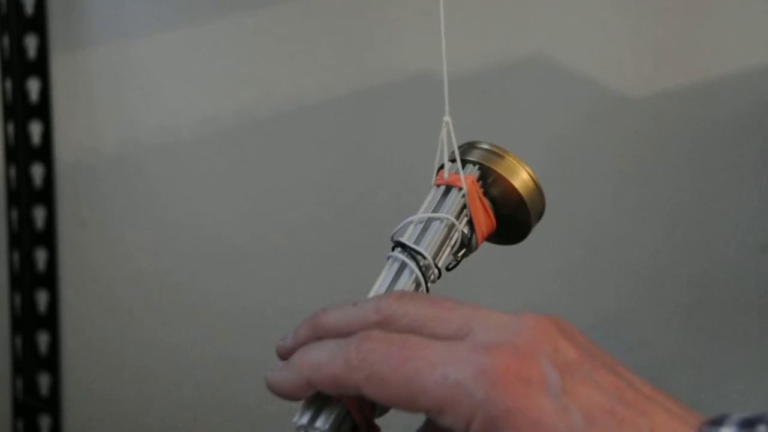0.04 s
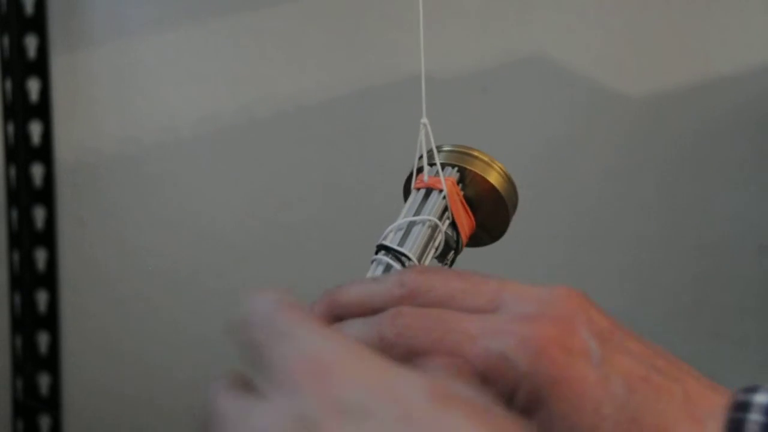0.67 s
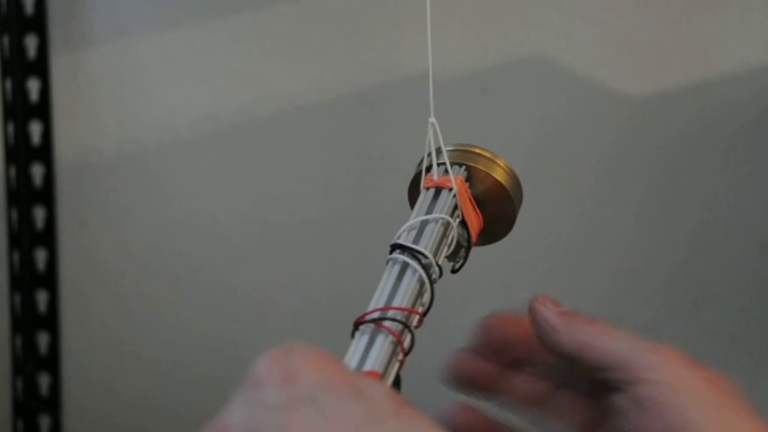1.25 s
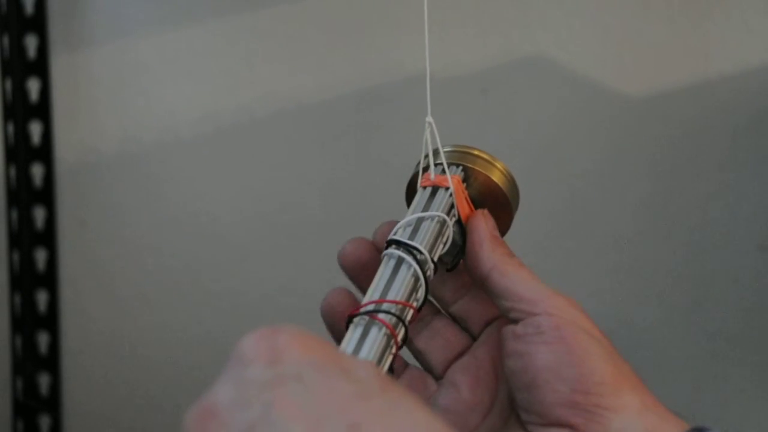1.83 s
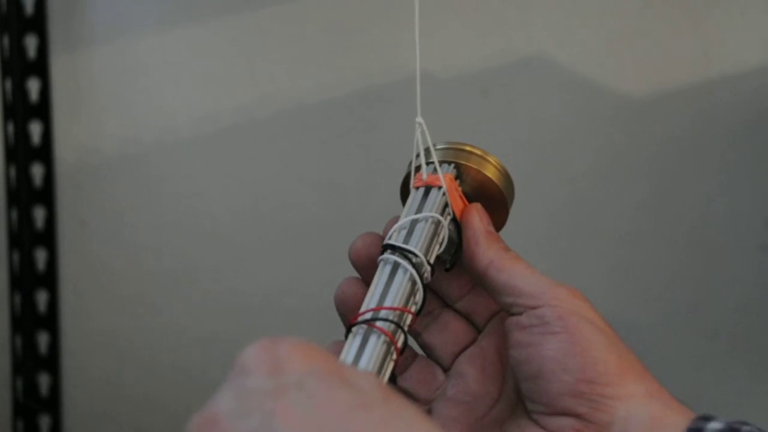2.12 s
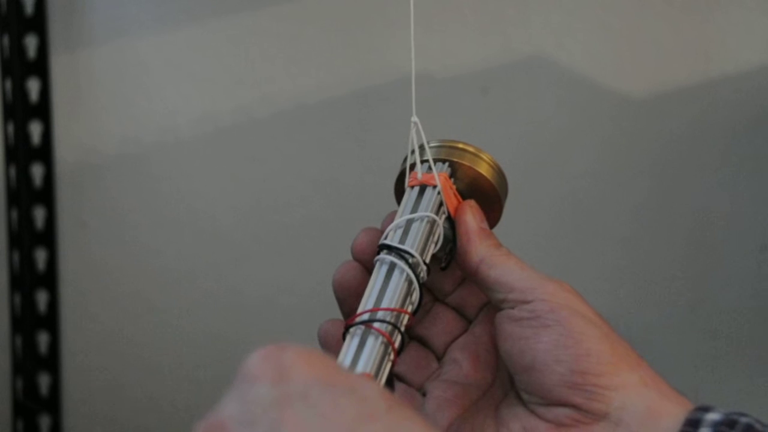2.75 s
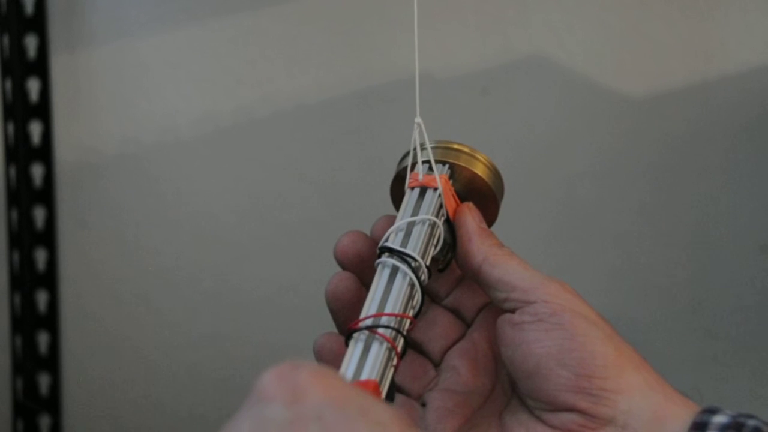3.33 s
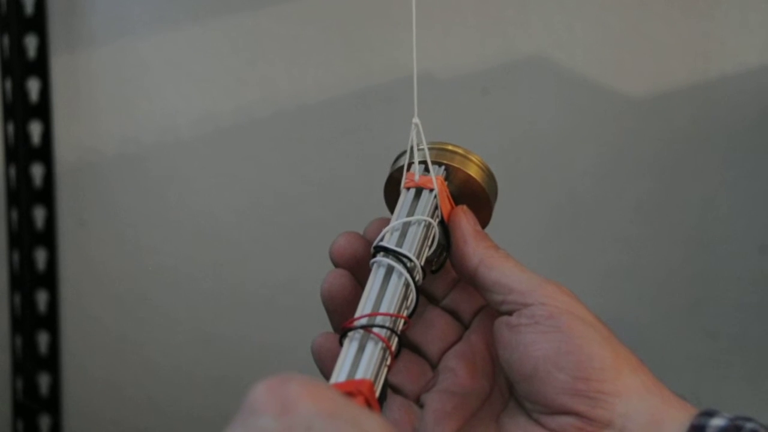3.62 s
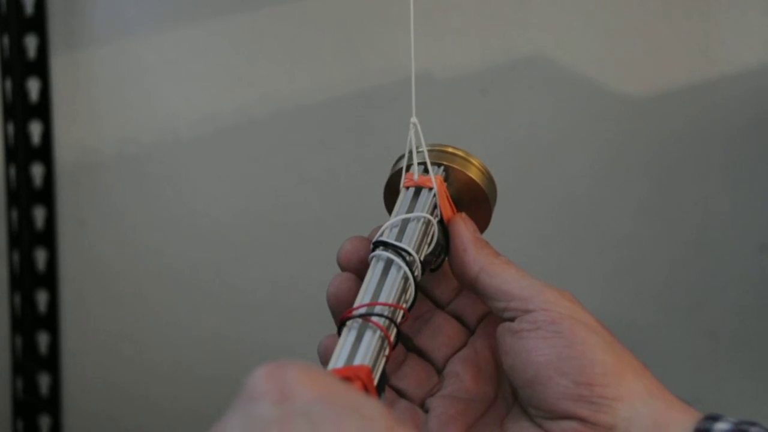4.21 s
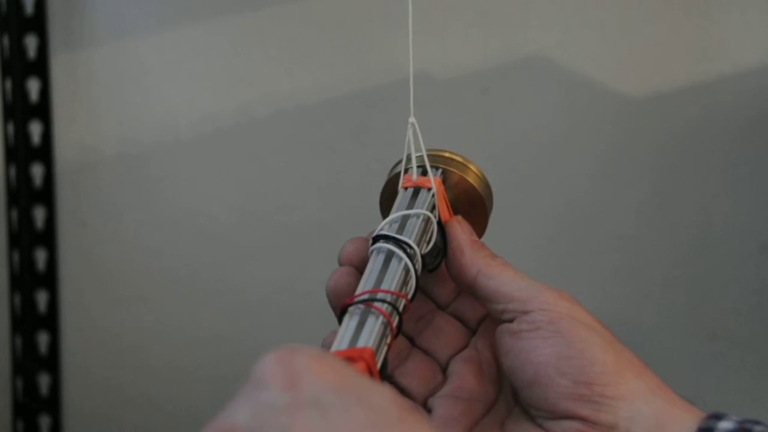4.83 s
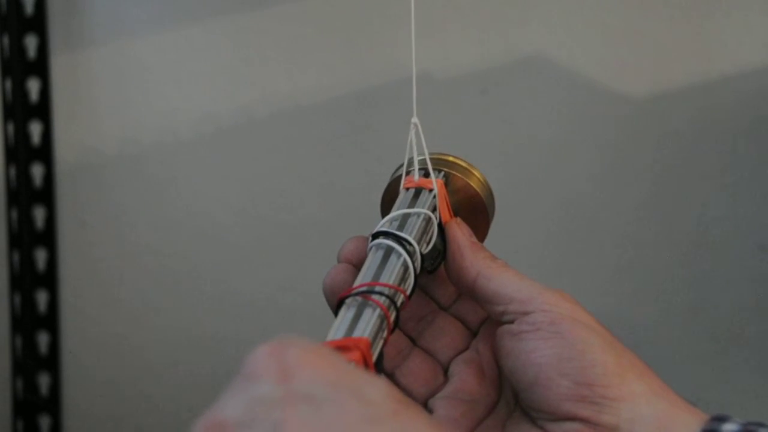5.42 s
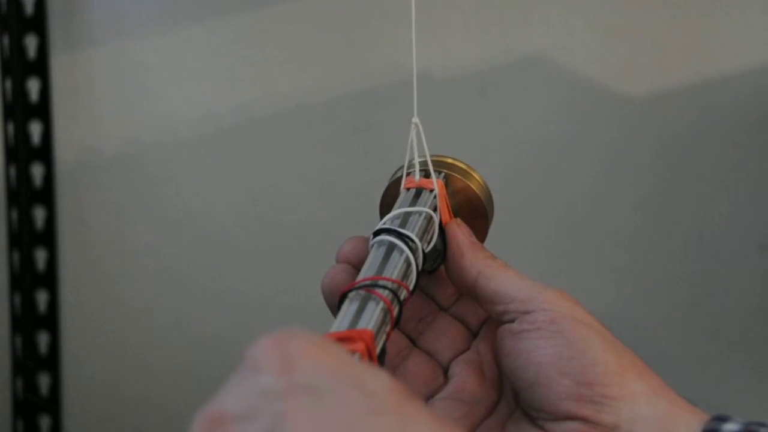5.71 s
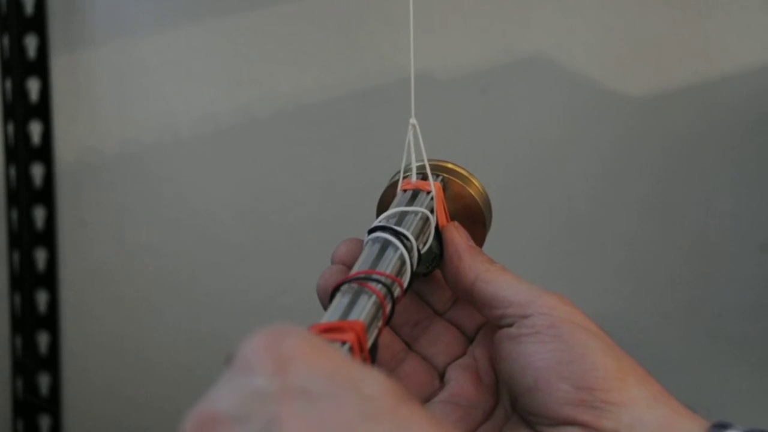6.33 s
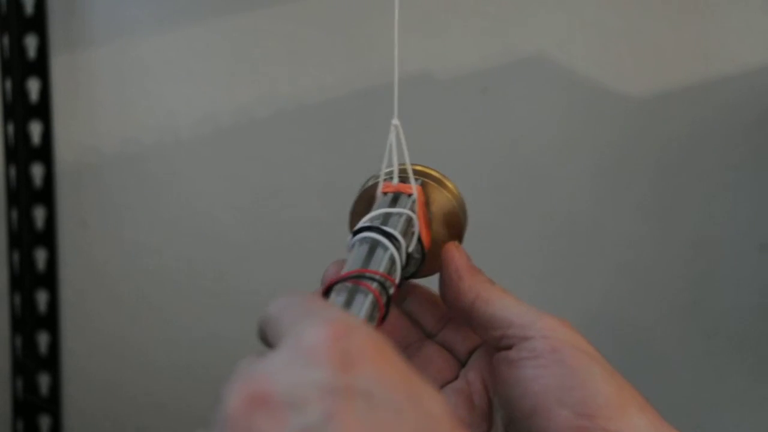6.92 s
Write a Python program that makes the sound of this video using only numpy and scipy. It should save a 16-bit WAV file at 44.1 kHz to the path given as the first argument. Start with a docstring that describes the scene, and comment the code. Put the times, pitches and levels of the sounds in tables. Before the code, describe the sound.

A small electric motor spins a brass wheel on a metal tube, running steadily with a hum, a fine metallic rasp and a thin, wavering high whine. In the first second a hand slides along the tube in a few short strokes. The motor then slows very slightly, and one faint rub comes near the end. It sounds close, in a quiet room with soft hiss.

```python
"""A small electric motor hums, whines and rasps in a quiet room.
It spins a brass wheel on a metal tube that hangs from a string. The spinning part (the rotor) is off
balance, so it hums; its brushes (sliding contacts) scrape and whine, biting harder once a turn.
It slows a little as fingers steady the tube. A hand slides on the tube at first and faintly at the end.
Mains hum and a soft hiss lie underneath."""
import sys
import numpy as np
from scipy import signal
from scipy.fft import rfft, irfft, next_fast_len
from scipy.io import wavfile

SR = 44100
rng = np.random.default_rng(int(sys.argv[2]) if len(sys.argv) > 2 else 0)


def dump_mix(stems):
    """Bounce the given channels to the path in sys.argv[1] as a 16-bit WAV at rate SR."""
    frames = np.atleast_2d(stems).T  # one column per channel
    limited = np.clip(frames, -1, 1)  # hard clip at full scale
    pcm = np.round(limited * 32767).astype(np.int16)
    wavfile.write(sys.argv[1], SR, pcm)


N = 306936
T = np.arange(N) / SR
SIDES = np.array([[.5], [-.5]])  # shares a left-right difference between the two sides

# how fast the rotor spins: time_s, turns_per_s
ROTOR_SPEED = [(0, 262.08), (1.2, 262.08), (2.5, 261.9), (3.8, 261.68), (5, 261.02), (6.2, 260.43),
               (6.96, 260.35)]
# the motor's tones, by order (order 2 vibrates twice a turn); the share is held within 0-1
# order: level_db, flutter_share, left_louder_db, left_lead_rad
MOTOR_TONES = {1: (-55.5, 0, 3, 0.5), 2: (-59, 0, 4.5, 0.62), 3: (-73, 0.1, -6, 1.1), 4: (-71, 0.4, 6, 1),
               5: (-69, 1.4, 9, 0), 6: (-68, 0.67, 0, -0.8), 7: (-69, 0.5, -6, 0), 8: (-69, 0.4, 7, 2),
               9: (-58.5, 0.2, 6.5, 0.86), 10: (-63.5, 0.55, 3.5, 0.64), 11: (-63, 1.8, 0.5, 0),
               12: (-69.5, 0.5, -10, 1.2), 13: (-68.5, -1.3, 2, 1.3), 14: (-65, 0.5, 0, 1.1),
               15: (-61, 1.3, 0, 1.1), 18: (-58, .2, -10.5, 2), 20: (-64, 0.5, 5, 0.7),
               21: (-63.5, -0.5, 7, 2), 22: (-68.5, -1, -6, 2), 23: (-69.5, 1, 1, 1.3),
               24: (-62.5, 0.6, -2.5, 1.94), 30: (-70, 1.5, 0.5, 2.5), 36: (-71, 1, -7, 4.5),
               40: (-65.5, 0.05, -2, 1.5), 41: (-59, 0.08, 5.5, 1.54), 42: (-52, 0.17, 8.5, 2.5),
               43: (-78, 1, 1, 3), 45: (-66, 1, 5, 3.5), 47: (-65, 0, 5, 4), 48: (-69, .3, 4, 4.5)}
# the next five tables only shape how tones swell and fade; MOTOR_TONES sets their average level
# off-balance hum, shifting with the grip: time_s, order_1_db, order_2_db, order_3_db
HUM_SWELL = [(0.0, -55.5, -61, -63.5), (0.76, -55.5, -61, -71.5), (2.14, -55.0, -58.0, -73.5),
             (4.84, -55.5, -58.5, -75), (6.35, -57.0, -57, -72), (6.63, -57.5, -57.5, -79),
             (6.95, -58, -56, -68)]
# the tube sings along with order 9, most when held firmly: time_s, level_db
TUBE_SWELL = [(0.0, -60.5), (0.7, -69), (0.79, -63), (0.94, -65.0), (1.89, -55.5), (2.24, -59.5),
              (2.61, -55.5), (2.86, -58.0), (3.5, -55.0), (3.69, -58.5), (3.89, -54.5), (4.74, -58),
              (6.1, -58.5), (6.32, -67.5), (6.51, -62.5), (6.95, -66)]
# loose chatter just above the tube's note: time_s, order_10_db, order_11_db
CHATTER_SWELL = [(0, -68, -64.0), (0.3, -65.5, -65), (1.2, -63.5, -69.0), (2.5, -66, -70.5),
                 (3.9, -64.5, -62.5), (4.75, -61.5, -61), (5.1, -64.5, -66.5), (6.3, -69, -62),
                 (6.96, -64.5, -60.5)]
# the lower whine of the brushes on their contacts, order 41: time_s, level_db
LOW_WHINE_SWELL = [(0.0, -65), (0.58, -59.5), (1.39, -57), (1.72, -51.5), (2.63, -61), (2.72, -54.5),
                   (2.88, -61), (3.28, -52), (3.68, -63), (4.02, -61), (4.14, -66), (4.57, -61),
                   (4.69, -62.5), (5.46, -55), (5.74, -60), (6.66, -58), (6.85, -62.5), (6.95, -62)]
# the upper whine, order 42: time_s, level_db
HIGH_WHINE_SWELL = [(0.0, -64.0), (0.28, -54), (0.92, -59), (1.44, -47), (1.55, -57), (1.71, -48.0),
                    (2.08, -59), (2.2, -48), (2.54, -52.5), (2.62, -71), (2.78, -49.0), (2.9, -62),
                    (3.31, -52.5), (3.71, -56.5), (3.84, -53), (4.36, -49), (4.5, -54.5), (4.76, -42),
                    (5.12, -48.5), (5.73, -41.5), (5.86, -56.5), (6.1, -49), (6.9, -47.5), (6.95, -56)]
# the bearing rattles briefly and the chatter flares: time_s, rise_db
BEARING_RATTLES = [(2.75, 6), (2.87, 6), (3.45, 9), (3.88, 5), (4.13, 4), (4.34, 5), (4.69, 5), (4.89, 6),
                   (5.41, 7), (6.75, 3.5), (6.86, 4)]
# tones of the housing, which buzzes more as fingers slow the motor: order
HOUSING_ORDERS = (5, 6, 7)
# how the motor's metal can rings when the brushes scrape: pitch_hz, relative_db
CAN_SPECTRUM = [(2000, -29.5), (2200, -16), (3150, -18), (3500, -11.5), (3800, -9.5), (4030, -3),
                (4190, -5.5), (4620, -4), (4770, 0.5), (5000, -3), (5480, -7), (5620, -13), (7600, -16.5),
                (10200, -20), (15500, -24.5)]
# the hand's strokes along the tube: start_s, end_s, level_db
HAND_STROKES = [(0.14, 0.22, -48.5), (.26, 0.395, -47), (.43, .48, -55), (0.86, 0.888, -49),
                (0.946, 0.985, -49.5), (6.713, 6.928, -60)]
# the sound of skin sliding on metal: pitch_hz, relative_db
SKIN_SPECTRUM = [(150, -17), (350, -4.5), (600, -15), (1000, -12), (1250, -5), (1550, -15), (2350, -6),
                 (2650, -0.5), (3080, 3.5), (3400, -12), (4100, -12), (5400, -7), (7000, -4.5),
                 (11000, -24)]
# steady room tones (low drone, mains hum, thin high whistle): pitch_hz, level_db
ROOM_TONES = [(24, -60.5), (48, -68.5), (120, -80.5), (240, -76.5), (300, -77), (360, -71), (420, -78),
              (480, -75.5), (540, -76.5), (600, -86), (720, -83), (876, -76.5), (900, -80.5), (15734, -74)]
# room rumble and hiss: pitch_hz, relative_db
AIR_SPECTRUM = [(15, 7.5), (90, 1), (200, -2), (380, -4), (650, -7.5), (1300, -6), (1900, -8.5), (4000, -4),
                (7000, -7), (9000, -5.5), (10400, -3), (12000, -5), (13500, -3.5), (15800, -8.5)]
# how noise reaches the left and right sides: pitch_hz, left_lead_rad, likeness (0-1), left_louder_db
STEREO_SPREAD = [(50, 0.5, 0.53, 0.5), (260, 0.26, 0.46, 0), (650, 0.77, 0.29, 1.5), (1580, 0.62, 0.65, 1),
                 (2400, 0.54, 1, 1.5), (2860, 0.23, 1, -1.5), (3520, 0.9, .65, 4), (4200, 0.56, 0.6, -2.5),
                 (4790, 1.86, 0.9, 4), (5300, 0.62, 0.92, -1.5), (5980, 2.4, 0.53, -3),
                 (6730, 1.7, 0.6, -0.5), (10500, 3.25, 0.49, 2.5), (12200, 3.7, 0.76, 2), (15600, 4, .4, 4)]


def motor_tones(angle, speed, buzz_db_per_lost_turn=1, buzz_hz=8.1, whine_hz=5, other_hz=12.6):
    """Tones at multiples of the spin speed; loose bearings make them flutter at the given rates."""
    buzz_db = buzz_db_per_lost_turn * (speed.max() - speed)
    swell_db = dict.fromkeys(HOUSING_ORDERS, buzz_db)
    swell_db[1], swell_db[2], swell_db[3] = over_time(HUM_SWELL)
    swell_db[9], = over_time(TUBE_SWELL)
    swell_db[10], swell_db[11] = bearing_chatter()
    swell_db[41], = over_time(LOW_WHINE_SWELL)
    swell_db[42], = over_time(HIGH_WHINE_SWELL)
    flutter_hz = {41: whine_hz, 42: whine_hz} | dict.fromkeys(HOUSING_ORDERS, buzz_hz)
    out = np.zeros((2, N))
    for order, (level_db, share, pan_db, lead) in MOTOR_TONES.items():
        share = np.clip(share, 0, 1)
        rate_hz = flutter_hz.get(order, other_hz)
        unsteady = (flutter(rate_hz) + 1j * flutter(rate_hz)) / np.sqrt(2)  # in strength and timing
        wobble = np.sqrt(1 - share) + np.sqrt(share) * unsteady
        strength = rms_one(from_db(swell_db.get(order, 0)) * wobble)
        tone = strength * np.exp(1j * (order * angle + 2 * np.pi * rng.random()))
        # standing waves in the room give each tone its own level and delay on each side
        stereo = from_db(level_db + pan_db * SIDES) * np.exp(1j * lead * SIDES)
        out += np.sqrt(2) * np.real(tone * stereo)
    return out


def bearing_chatter(half_rattle_s=0.027):
    """How the two chattering tones swell, in dB: a slow drift with short rattles on top."""
    flare_db = sum(db * np.exp(-((T - time_s) / half_rattle_s) ** 2) for time_s, db in BEARING_RATTLES)
    return [drift_db + flare_db for drift_db in over_time(CHATTER_SWELL)]


def brush_rasp(angle, loose_db=-46, grip_db=0.77, push_db=1.5, grip_start_s=1.7, grip_takes_s=1):
    """The brushes scrape and ring the metal can, harder when the hand grips or pushes the tube."""
    grip = np.clip((T - grip_start_s) / grip_takes_s, 0, 1)
    push = stroke_strength()
    level_db = loose_db + grip_db * grip + push_db * push / push.max()
    bite_db = 3.5 * np.exp(2.6 * (np.cos(angle) - 1))  # one short, harder bite each turn
    lean_db = 0.05 * np.cos(angle)  # the brushes lean with the off-balance rotor
    uneven_db = 1.16 * flutter(rate_hz=22)
    force = from_db(bite_db + lean_db + uneven_db)
    return from_db(level_db) * shaped_noise(CAN_SPECTRUM, force)


def contact_bumps(angle, level_db=-63, first_order=25, last_order=58, points=1024):
    """The same tiny bumps pass under the brushes every turn, making a row of faint high tones."""
    orders = np.arange(points // 2 + 1)
    wanted = (orders >= first_order) & (orders <= last_order)
    bumps = irfft(rfft(rng.standard_normal((2, points))) * wanted)
    one_turn = 2 * np.pi * np.arange(points) / points
    whine = np.array([np.interp(angle, one_turn, side, period=2 * np.pi) for side in bumps])
    return from_db(level_db) * rms_one(whine)


def hand_slide(uneven_db=2.0):
    """Skin slides on the tube in short strokes with an uneven grip."""
    pressure = from_db(uneven_db * flutter(rate_hz=19))
    return stroke_strength() * shaped_noise(SKIN_SPECTRUM, pressure)


def stroke_strength(fade_s=0.033):
    """How hard the hand rubs: each stroke rises, holds and falls."""
    return sum(from_db(db) * np.clip(np.minimum(T - start_s, end_s - T) / fade_s + .5, 0, 1)
               for start_s, end_s, db in HAND_STROKES)


def room(air_db=-48.5):
    """Steady humming tones over rumble and hiss."""
    hum = sum(np.sqrt(2) * from_db(db) * np.sin(2 * np.pi * (hz * T + rng.random()))
              for hz, db in ROOM_TONES)
    return hum + from_db(air_db) * shaped_noise(AIR_SPECTRUM)


def shaped_noise(spectrum, force=1):
    """Stereo noise that follows a force and takes on a spectrum's tone colour; average level 1."""
    size = next_fast_len(N)
    hz = np.fft.rfftfreq(size, 1 / SR)
    shared, *separate = rfft(rng.standard_normal((3, N)) * force, size)
    lead, likeness, pan_db = over_pitch(STEREO_SPREAD, hz)
    likeness = np.clip(likeness, 0, 1)
    direct = np.sqrt(likeness) * shared * np.exp(1j * lead * SIDES)
    scattered = np.sqrt(1 - likeness) * np.array(separate)
    colour_db, = over_pitch(spectrum, hz)
    coloured = (direct + scattered) * from_db(colour_db + pan_db * SIDES)
    return rms_one(irfft(coloured, size)[:, :N])


def flutter(rate_hz, fastest_hz=70):
    """A random wobble of typical size 1, mostly slower than rate_hz."""
    step, warm_up = 64, 2000  # samples per point, points skipped while the smoothing settles
    wobble = rng.standard_normal(N // step + warm_up + 2)
    for hz in (rate_hz, fastest_hz):
        wobble = signal.lfilter([1], [1, -np.exp(-2 * np.pi * hz * step / SR)], wobble)
    wobble = rms_one(wobble[warm_up:])
    return np.interp(np.arange(N) / step, np.arange(len(wobble)), wobble)


def over_time(rows):
    """Join a table's points in time: one curve for each column after the first."""
    time_s, *columns = np.transpose(rows)
    return [np.interp(T, time_s, column) for column in columns]


def over_pitch(rows, hz):
    """Read each column after the first at the given pitches."""
    pitch_hz, *columns = np.transpose(rows)
    return [np.interp(np.log(np.maximum(hz, 1)), np.log(pitch_hz), column) for column in columns]


def from_db(db):
    """Turn decibels into a number to multiply by."""
    return 10 ** (np.asarray(db) / 20)


def rms_one(x):
    """Scale a signal so its average level (rms) is 1."""
    return x / np.sqrt(np.mean(np.abs(x) ** 2) + 1e-20)


def scene():
    """The turning rotor drives the tones and the rasp; the hand and the room join in."""
    speed, = over_time(ROTOR_SPEED)
    angle = 2 * np.pi * np.cumsum(speed) / SR
    return motor_tones(angle, speed) + contact_bumps(angle) + brush_rasp(angle) + hand_slide() + room()


def record(dry):
    """Cut the very highest treble steeply."""
    cutoff_hz = 15800
    return signal.sosfilt(signal.ellip(12, .1, 80, cutoff_hz, fs=SR, output="sos"), dry)


dry = scene()
out = record(dry)
dump_mix(out)
```